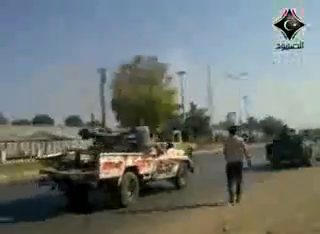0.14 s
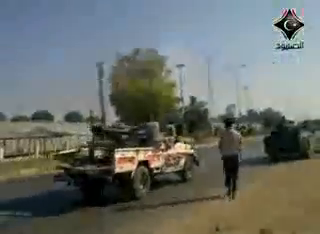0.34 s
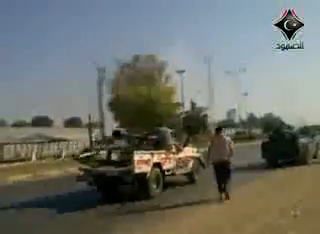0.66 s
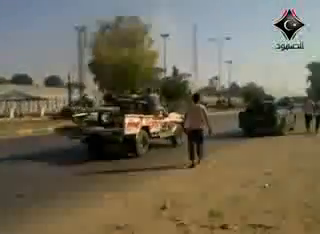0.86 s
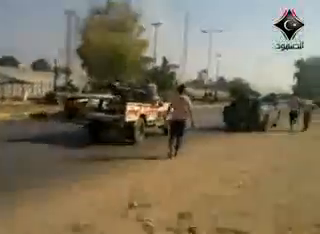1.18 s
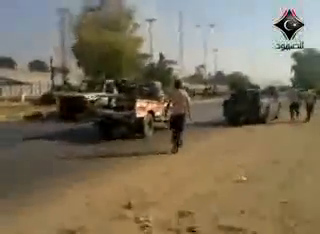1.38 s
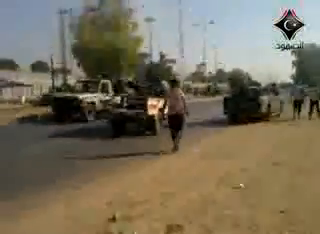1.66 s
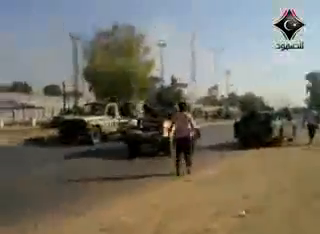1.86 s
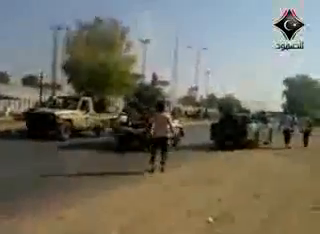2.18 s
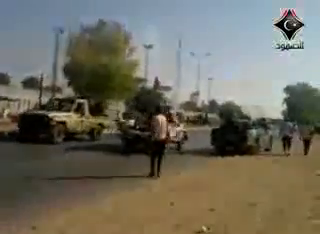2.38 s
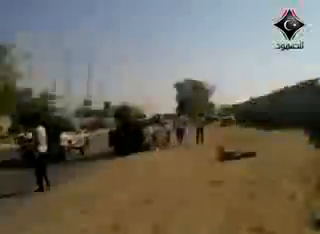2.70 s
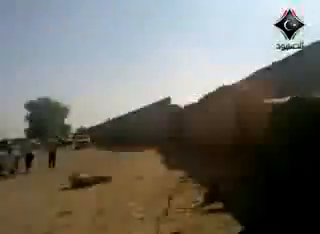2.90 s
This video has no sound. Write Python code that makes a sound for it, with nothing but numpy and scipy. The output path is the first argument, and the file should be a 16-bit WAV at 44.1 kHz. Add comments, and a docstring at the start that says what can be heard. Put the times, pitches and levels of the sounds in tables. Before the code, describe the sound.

Heavy machine gun fires a five-round burst, then a longer one, close by on an open road

```python
"""On an open road a heavy machine gun fires two bursts close by, over the last echoes of an earlier one.
Each round is a falling sweep under a noise crack, with a rolling tail of shaped noise from walls and vehicles.
Band-limited noise grains make the distinct slaps of a few far walls and some louder single echoes.
Engines idle behind as a fluttering noise rumble, and a limiter presses the bursts flat."""
import sys
import numpy as np
from scipy import signal
from scipy.fft import rfft, irfft, next_fast_len
from scipy.io import wavfile
from scipy.ndimage import uniform_filter1d, minimum_filter1d, map_coordinates

SR = 44100
rng = np.random.default_rng(int(sys.argv[2]) if len(sys.argv) > 2 else 0)


def store_pcm(level_fs):
    """Save levels as 16-bit WAV."""
    pcm = np.round(np.clip(level_fs, -1, 1) * 32767).astype(np.int16)
    wavfile.write(sys.argv[1], SR, np.atleast_2d(pcm).T)


N = 134505

# Rounds fired: (time [s], echo level [dB], bright wall's slap offset [dB],
# tilt [dB per octave well above TILT_HZ], direct blast over echo level [dB])
ROUNDS = [(.1360, 10.5, -7, 0.2, -7.5), (.2012, 7.5, -9, 1, 0), (.2566, 1, -3.4, 1.84, -2.5),
          (.3109, 7.5, 2, -1.6, -2), (.3681, 8, -4, 0, -4.5), (1.0448, 7.5, -3, 0.87, -5.5),
          (1.1077, 3, 4.5, 1.5, 4), (1.1622, 5, 3, -0.3, 2.5), (1.2147, 2, -10, -0.9, 0.5),
          (1.2683, 2, -1, 1.24, -1), (1.3214, 2, -10.5, 0.4, 5), (1.3771, 6, -3, 0.45, 0.5),
          (1.4326, 7.5, -4, -0.85, 1.5), (1.4853, 8, -9, 1.23, 1.5), (1.5409, 6.5, -15.5, 2, 1.5),
          (1.5938, 6, -7, -0.4, 2), (1.6448, 6, -4, -0.16, 6)]
# Colour of the muzzle crack: (frequency [Hz], level [dB])
CRACK_COLOUR = [(300, -12.5), (700, -2), (1300, 1), (2300, -2.5), (3500, -12), (7000, -27)]
# Near surfaces that repeat the blast: (delay [s], level [dB])
NEAR_SURFACES = [(.0088, -3), (.017, -11.5), (.028, -7.5), (.040, -11)]
# Colour of the rolling echoes: (frequency [Hz], relative level [dB])
ROLL_COLOUR = [(15, -47), (25, -16.5), (60, -7.5), (110, 1.5), (170, 1.5), (240, 1.5), (330, -9), (600, -6),
               (880, -13.5), (1150, -11.5), (2000, -17), (4000, -22.5), (6200, -21), (7500, -16.5),
               (9800, -60), (16500, -120)]
# Main decay of the roll: (frequency [Hz], time to fall 60 dB [s])
ROLL_DECAY = [(60, 3.07), (200, 2.04), (600, 1.044), (1500, 1.444), (3500, 1.304), (5500, 0.9),
              (7000, 0.28)]
# Gathering of the roll, slowest at the top: (frequency [Hz], rise time constant [s])
ROLL_GATHER = [(200, 0.01), (1500, 0.0065), (3500, 0.0054), (6000, 0.02)]
# Walls that slap back: (delay [s], level [dB], centre [Hz], resonance width [Hz], time to swell to peak [s])
FAR_WALLS = [(0.404, -19, 111.3, 57, 0.018), (0.445, -17, 201, 135, 0.016),
             (0.072, -22.5, 650, 306, 0.0097), (.127, -21.5, 906, 1100, .006),
             (0.156, -24, 800, 900, 0.0047), (0.227, -19.5, 110, 70, 0.023),
             (0.289, -18.5, 210, 140, 0.011), (.52, -25, 192.5, 140, .015)]
# The wall whose slap varies by round: (delay [s], centre [Hz], resonance width [Hz], time to swell to peak [s])
VARYING_WALL = (.4545, 1800, 2170, 0.0081)
# Single echoes that stand out: (time [s], level [dB], centre [Hz], resonance width [Hz], time to swell to peak [s])
STRONG_ECHOES = [(0, -10, 105, 70, .008), (.255, -8, 1150, 297, 0.0077), (0.496, -14.5, 1110, 1300, 0.0054),
                 (.595, -9.5, 125.2, 80, 0.021), (0.766, -7.5, 120.6, 80, 0.015),
                 (0.814, -10, 125, 80, .012), (1.718, -4.5, 671, 350, .008),
                 (1.805, -13, 1044, 500, 0.0057), (1.822, -6.5, 230, 130, .012),
                 (1.932, -8, 216, 130, .011), (2.045, -9, 119, 80, .013), (2.107, -13, 226, 130, 0.013),
                 (2.166, -15.5, 210, 130, 0.0086)]
# Colour of idling engines and road noise: (frequency [Hz], relative level [dB])
ROAD_COLOUR = [(15, -60), (25, -27), (181, -15), (304, -9), (454, -24), (728, -17.5), (879, -19.5),
               (2370, -27), (5800, -50.5), (7000, -94), (9100, -127), (15400, -120)]
# Microphone response: (frequency [Hz], gain [dB])
MIC_RESPONSE = [(25, -4), (200, -3), (5000, -0.3), (6500, -0.5), (7600, -15.5)]

LEAD_S = 1  # room ahead of the start for the earlier burst
TILT_HZ = 400
SAME_PATHS = 0.36  # share of the roll's energy that every round repeats
EARLIER_END_S, EARLIER_GAP_S = -0.455, 0.055
EARLIER_DB, EARLIER_SLAP_DB = 3.5, -12.5
BLAST_FROM_HZ, BLAST_TO_HZ = 2700, 160
BLAST_FALL_S, BLAST_RISE_S = 0.00065, 0.0006  # time constants of the pitch fall and level rise
BLAST_T60_S, BLAST_DB = 0.055, -2
CRACK_T60_S, CRACK_DB, CRACK_RISE_S = 0.039, -6.5, 0.0013
ROLL_DB, ROLL_PATCHY_DB = -14, 2.5
ROLL_GRAIN_DB = 2.5  # rattle shared by all frequencies above TILT_HZ
LATE_DB, LATE_SLOWER = -16.5, 2.02  # a weak decay from farther away, this many times slower
BRIGHT_WALL_DB = -21
SLAP_ROUGH_DB, SLAP_GRAIN_S = 2.5, 0.0015  # an uneven wall breaks its slap into grains
ROAD_DB, ROAD_FLUTTER_DB = -30.5, 1.5
LIMIT_DB, LIMIT_HOLD_S, LIMIT_SMOOTH_S, KNEE = 0.5, 0.0094, 0.022, 1.57
CLIP_TOP, CLIP_HARD = 1.2, 4
TOP_HZ = 7660


def gun():
    """Fires all rounds; their rolls partly repeat, since the surroundings stay the same."""
    out = np.zeros(N + (LEAD_S + 2) * SR)
    earlier = [(EARLIER_END_S - EARLIER_GAP_S * k, EARLIER_DB, EARLIER_SLAP_DB, 0, 0) for k in range(6)]
    lasting = roll()
    for time, echo_db, slap_db, tilt_db, blast_db in earlier + list(ROUNDS):
        fresh = roll()
        shot = np.sqrt(SAME_PATHS) * lasting + np.sqrt(1 - SAME_PATHS) * fresh
        shot += slaps(slap_db)
        direct = muzzle()
        shot[:len(direct)] += amp(blast_db) * direct
        shot = filtered(shot, lambda f: amp(echo_db + tilt_db * np.log2(1 + f / TILT_HZ)))
        out[round((time + LEAD_S) * SR):][:len(shot)] += shot
    return out[LEAD_S * SR:][:N]


def muzzle():
    """The blast arrives as a falling sweep under a short noise crack; near surfaces repeat it."""
    t = np.arange(SR // 20) / SR
    hz = BLAST_TO_HZ + (BLAST_FROM_HZ - BLAST_TO_HZ) * np.exp(-t / BLAST_FALL_S)
    sweep = np.sin(2 * np.pi * np.cumsum(hz) / SR)
    sweep *= (1 - np.exp(-t / BLAST_RISE_S)) * amp(BLAST_DB - 60 * t / BLAST_T60_S)
    crack = noise(len(t), lambda f: amp(along(CRACK_COLOUR, f)))
    crack *= (1 - np.exp(-t / CRACK_RISE_S)) * amp(CRACK_DB - 60 * t / CRACK_T60_S)
    blast = sweep + crack
    out = np.pad(blast, (0, SR // 5))
    for delay, db in NEAR_SURFACES:
        out[round(delay * SR):][:len(t)] += amp(db) * blast
    return out


def roll():
    """Countless echoes of one round; each frequency gathers and dies at its own speed, in patches."""
    hz, t, z = signal.stft(rng.standard_normal(2 * SR), SR, nperseg=256)
    hz = hz[:, None]
    patches = uniform_filter1d(rng.standard_normal(z.shape), size=5, axis=0)
    patches = unit(uniform_filter1d(patches, size=6, axis=1))
    # separate reflections rattle the upper bands together
    rattle = rng.standard_normal(len(t)) * (hz > TILT_HZ)
    fall_db = -60 * t / along(ROLL_DECAY, hz)
    shape = amp(fall_db) + amp(LATE_DB + fall_db / LATE_SLOWER)
    shape *= 1 - np.exp(-t / along(ROLL_GATHER, hz))
    level = amp(ROLL_DB + ROLL_PATCHY_DB * patches + ROLL_GRAIN_DB * rattle)
    tail = signal.istft(z * shape * level, SR, nperseg=256)[1][:2 * SR]
    # even out the overall level of the colour curve
    scale = np.sqrt(np.mean(amp(2 * along(ROLL_COLOUR, np.linspace(20, SR / 2, num=4000)))))
    coloured = filtered(tail, lambda f: amp(along(ROLL_COLOUR, f)) * (f > 20) / scale)
    onset = np.minimum(np.arange(2 * SR) / SR / along(ROLL_GATHER, 0), 1)
    return onset * coloured


def slaps(bright_db):
    """Each far wall returns one echo of the round after its own delay."""
    out = np.zeros(2 * SR)
    delay, *rest = VARYING_WALL
    for wall in FAR_WALLS + [(delay, BRIGHT_WALL_DB + bright_db, *rest)]:
        add_echo(out, *wall)
    return out


def loud_echoes():
    """The few echoes that stand out of the roll."""
    out = np.zeros(N)
    for echo in STRONG_ECHOES:
        add_echo(out, *echo)
    return out


def add_echo(out, time, db, centre_hz, width_hz, swell_s):
    """Adds an echo that reflection has smeared, roughened and narrowed to a band of noise."""
    t = np.arange(SR // 8) / SR

    def resonance(f):
        damping = (f * width_hz) ** 2
        # squaring narrows the band further
        return (damping / ((centre_hz ** 2 - f ** 2) ** 2 + damping)) ** 2

    band = noise(len(t), resonance)
    grains = amp(SLAP_ROUGH_DB * map_coordinates(rng.standard_normal(len(t)), [t / SLAP_GRAIN_S]))
    shape = (t / swell_s * np.exp(1 - t / swell_s)) ** 2
    echo = unit(band * grains * shape) * np.sqrt(np.mean(shape ** 2))
    out[round(time * SR):][:len(t)] += amp(db) * echo


def road():
    """Idling engines and road blend into a noise rumble whose level flutters."""
    flutter = map_coordinates(rng.standard_normal(80), [np.arange(N) * 20 / SR])  # 20 random points per second
    rumble = noise(N, lambda hz: amp(along(ROAD_COLOUR, hz)) * (hz > 20))
    return amp(ROAD_DB + ROAD_FLUTTER_DB * flutter) * rumble


def amp(db):
    """Decibels to amplitude."""
    return 10 ** (np.asarray(db) / 20)


def unit(x):
    """Scales to an rms of 1."""
    return x / np.sqrt(np.mean(x ** 2) + 1e-20)


def along(points, hz):
    """Reads a (frequency [Hz], value) curve on a log frequency axis."""
    f, v = np.transpose(points)
    return np.interp(np.log(hz + 1), np.log(f + 1), v)


def filtered(x, response):
    """Multiplies the spectrum by a response of frequency."""
    n = x.shape[-1]
    m = next_fast_len(n + 8192)
    spectrum = rfft(x, m) * response(np.fft.rfftfreq(m, 1 / SR))
    return irfft(spectrum, m)[..., :n]


def noise(n, response):
    """Coloured noise of rms 1."""
    return unit(filtered(rng.standard_normal(n), response))


def scene():
    """Gun in front, stray echoes around it, engines behind; one channel."""
    return (gun() + loud_echoes() + road())[None]


def record(dry):
    """Limiter, soft clipping, microphone colour and band limit."""
    hold = max(round(LIMIT_HOLD_S * SR), 3)
    smooth = max(round(LIMIT_SMOOTH_S * SR), 3)
    peak = -minimum_filter1d(-np.abs(dry), size=hold, axis=1)
    gain = (1 + (peak / amp(LIMIT_DB)) ** KNEE) ** (-1 / KNEE)
    limited = dry * uniform_filter1d(gain, size=smooth, axis=1)
    clipped = limited / (1 + np.abs(limited / CLIP_TOP) ** CLIP_HARD) ** (1 / CLIP_HARD)
    return filtered(clipped, lambda hz: amp(along(MIC_RESPONSE, hz)) * (hz < TOP_HZ))


dry = scene()
out = record(dry)
store_pcm(out)
```